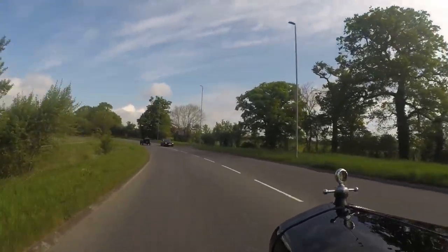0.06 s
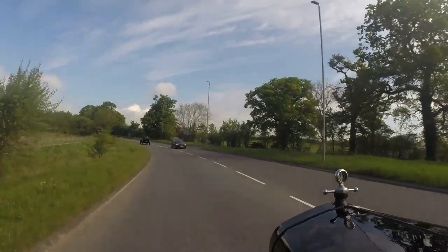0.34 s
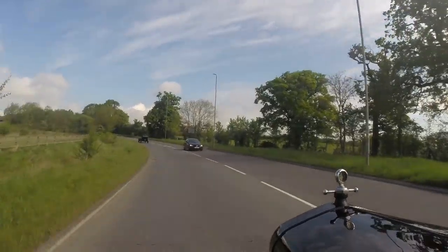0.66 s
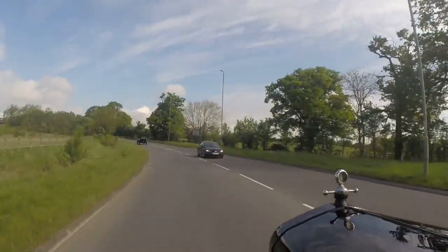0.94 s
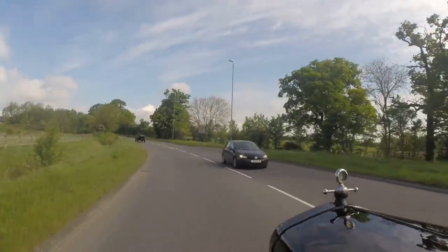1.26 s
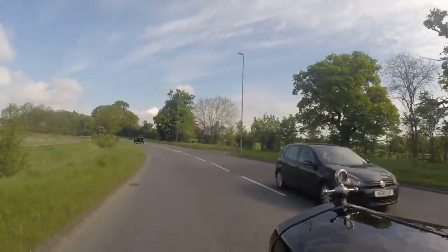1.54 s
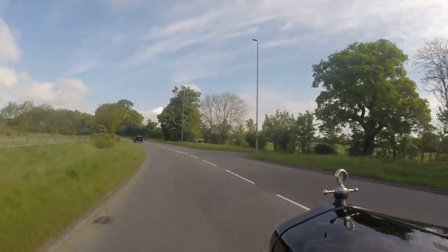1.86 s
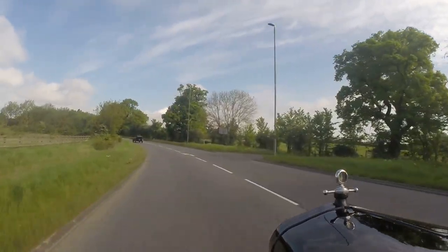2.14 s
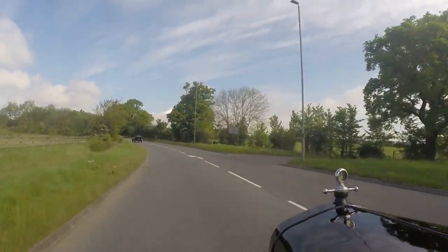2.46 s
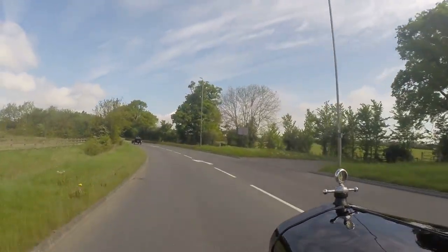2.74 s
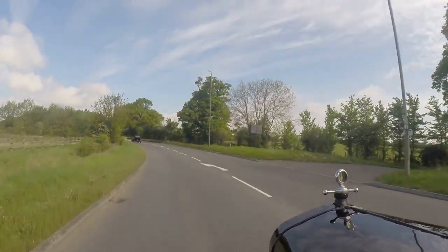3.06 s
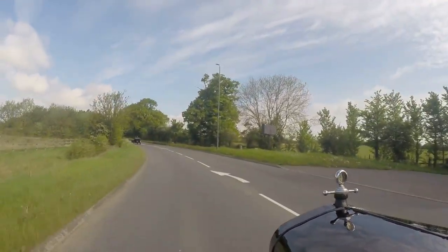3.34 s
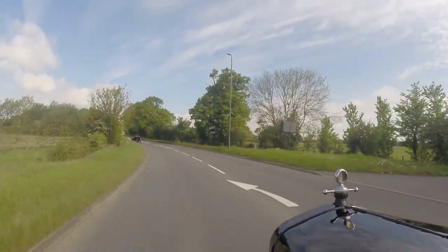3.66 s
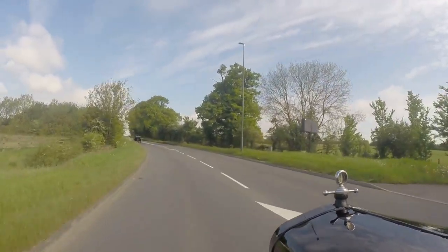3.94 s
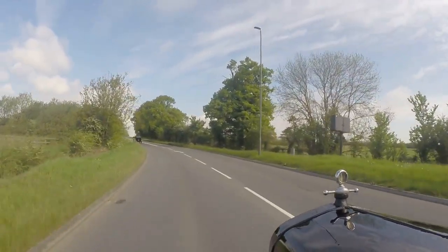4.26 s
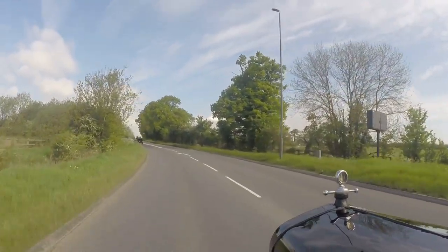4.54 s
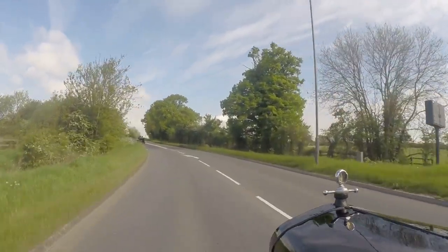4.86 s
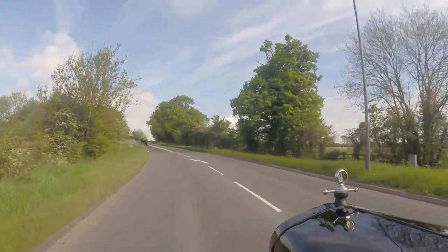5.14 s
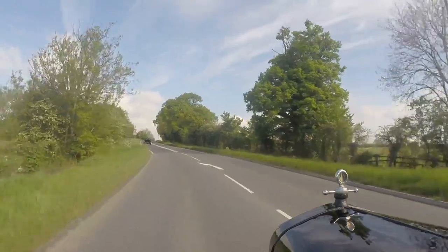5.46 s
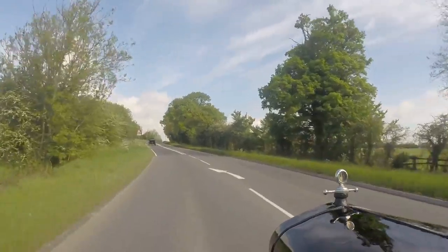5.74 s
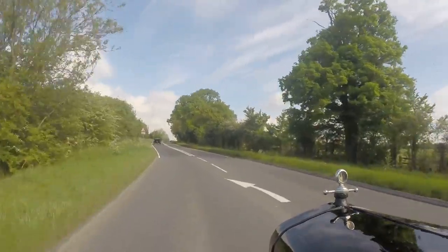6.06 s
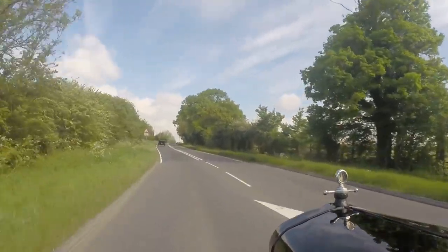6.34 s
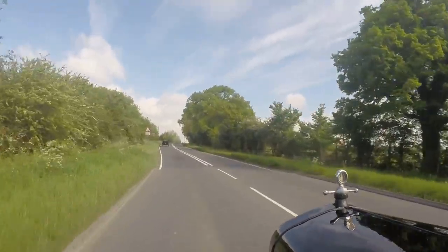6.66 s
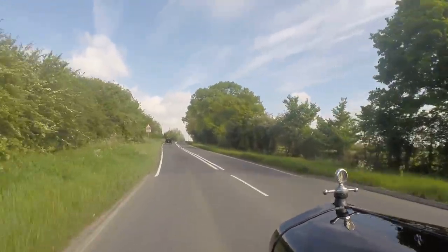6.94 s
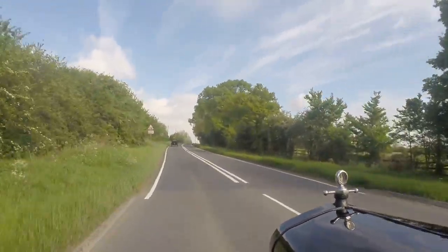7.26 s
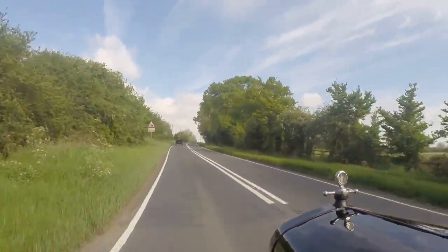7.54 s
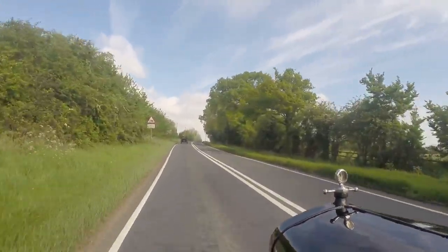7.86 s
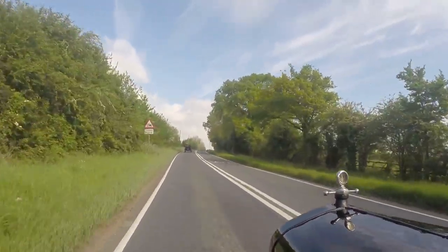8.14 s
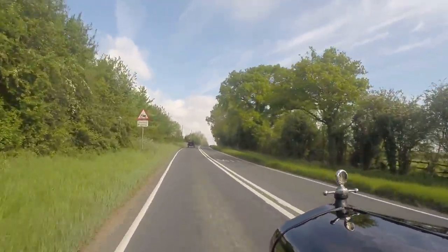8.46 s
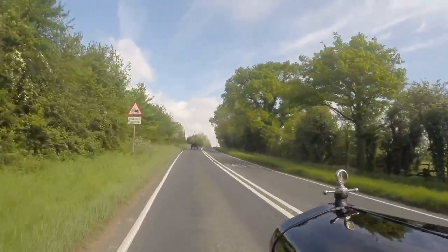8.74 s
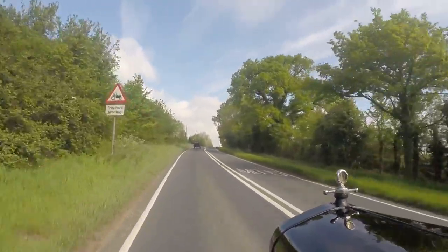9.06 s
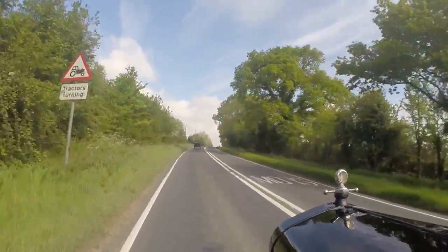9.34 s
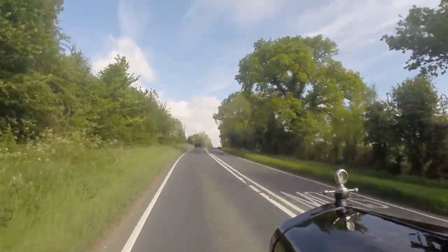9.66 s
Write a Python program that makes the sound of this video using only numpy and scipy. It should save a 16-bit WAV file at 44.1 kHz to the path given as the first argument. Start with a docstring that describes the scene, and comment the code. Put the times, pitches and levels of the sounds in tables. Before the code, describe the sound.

An old four-cylinder car engine drones and clatters steadily along an open road, with tyre rumble and wind buffeting.

```python
"""An old four-cylinder car drones along an open road, heard from just behind the bonnet, slowly gaining speed.
The crank shakes the body and the exhaust drones; a belt-driven fan hums, valves clatter, gears sizzle
and a loose bearing knocks once a turn. Tyres drum through the body, wind buffets, grit ticks on the wings.
Early on a car passes the other way; near the end the tarmac turns smoother."""
import sys
import numpy as np
from scipy import signal
from scipy.fft import rfft, irfft, next_fast_len
from scipy.io import wavfile
from scipy.ndimage import uniform_filter1d, minimum_filter1d, map_coordinates

SR = 44100
rng = np.random.default_rng(int(sys.argv[2]) if len(sys.argv) > 2 else 0)


def persist_wave(psi):
    """Save psi, clipped to +-1, as 16-bit WAV."""
    counts = np.round(np.clip(psi, -1, 1) * 32767).astype(np.int16)
    wavfile.write(sys.argv[1], SR, np.atleast_2d(counts).T)


N = 432180

# Each row: time in seconds, crank speed in Hz.
CRANK_SPEED = [(0, 34.78), (0.6, 35.08), (1.5, 35.98), (2.5, 36.83), (3.5, 37.36), (5, 38.07), (6.5, 38.59),
               (8, 38.93), (9.8, 39.16)]
# Each row: multiple of crank speed, level at cruise in dB, rise in dB per Hz of crank speed,
# flutter in dB, phase drift in radians.
ENGINE_ORDERS = [(1, -18.5, 1.27, 1.1, 0.096), (2, -18, -.5, 0.67, .03), (2.5, -42.5, -1.5, 1.5, 0.22),
                 (3, -30.5, .8, -0.4, 0.058), (3.5, -37.5, -2, 4, .2), (4, -33, -4, -0.5, 0.091),
                 (5, -36.5, -0.5, 1, 0.16), (6.5, -40, 1.5, 1.5, 0.27)]
# Resonances the orders climb through. Each row: centre in Hz, half width in Hz, boost in dB.
BOOMS = [(105.2, 1.6, 8), (111, 1.7, 8)]
# Each row: start in seconds, end in seconds, drop in effort in dB.
THROTTLE_EASES = [(0, 0.26, 4), (7.82, 8.202, 1.15)]
# Each row: multiple of fan speed, level in dB before the bonnet resonance.
FAN_TONES = [(1, -29.5), (2, -40), (4, -50), (6, -58)]
# Single impacts. Each row: time in seconds, relative level in dB.
HARD_KNOCKS = [(0.36, -17), (1.6831, -18), (2.361, -17.5), (3.896, -21), (7.1202, -14), (7.6072, -15),
               (8.8957, -15.5), (8.9693, -16), (9.1501, -17), (9.305, -15), (9.4827, -14.5)]
GRIT_HITS = [(2.0772, -34), (2.987, -28), (2.9996, -30), (4.0384, -31), (4.2567, -30), (5.879, -31),
             (6.6553, -32), (7.1784, -31), (7.4435, -25), (7.672, -29), (9.4105, -34)]
# Bearing fits and rough road. Each row: centre in seconds, half length in seconds, gain in dB.
BEARING_FITS = [(1.1, 0.35, 5.5), (1.65, 0.12, 5.5), (5.75, 0.18, 7), (6.248, .15, 3), (6.545, 0.057, 10),
                (7.198, 0.11, 2.5), (8.65, 0.35, 5), (9.3, 0.072, -2)]
ROAD_BUMPS = [(1.45, 0.23, 1.3), (3, 0.11, 2.5), (6.6, 0.059, 2.5), (7.33, .05, 1.5), (7.65, 0.045, 3),
              (8.934, 0.066, 5)]
# Resonances of the parts. Each row: centre in Hz, width in Hz, gain in dB.
BONNET_MODES = [(424.3, 35, 0), (513, 114, -1.5), (709, 76, -1), (910.5, 50, -6.5)]
BLOCK_MODES = [(1164, 113, 2.5), (1445, 210, 4), (1689, 112, 3), (1999, 270, 1), (2287, 92, 1),
               (2453, 290, -3), (3434, 270, -15.5)]
STEEL_MODES = [(3423, 310, 0.5), (4140, 125, -1), (4317, 280, -1), (4850, 180, -4.5), (5740, 214, 1.5),
               (6420, 280, -11), (6770, 270, -2.5), (7260, 170, -12), (7600, 490, -16), (9600, 1200, -20.5)]
TRIM_MODES = [(12900, 700, -2), (13900, 700, -12)]
# Noise colours. Each row: frequency in Hz, relative density in dB.
BODY_SPECTRUM = [(30, -31), (55, 1.5), (90, 2), (130, -0.5), (175, -2.5), (215, -3), (260, 3), (310, 2),
                 (345, -3), (400, -12), (470, -23.5), (700, -22)]
BUFFET_SPECTRUM = [(12, -32), (19, -11), (25, -1), (30, 0), (35, -2), (44, -10), (56, -20), (90, -45)]
AIRSTREAM_SPECTRUM = [(200, -19), (500, 1), (800, -8), (1000, -7.5), (1500, 0), (2200, -3), (2800, -6),
                      (3200, -12.5), (5000, -20.5), (6300, -20), (7500, -22.5), (8700, -30.5),
                      (11500, -41.5), (14000, -42), (15000, -48)]
SPRAY_SPECTRUM = [(1500, -15), (3500, 10), (5000, -1), (7200, 6), (9500, -10), (12000, -16), (14000, -20),
                  (15000, -28)]
PATTER_SPECTRUM = [(4000, -20), (7500, 4.5), (10000, -8), (13000, -14.5), (15000, -21)]
ONCOMING_SPECTRUM = [(300, -10), (800, 2), (1400, 0), (2500, -8), (5000, -27)]

CRUISE_HZ, FAN_PER_CRANK_TURN = 37, 11 / 4
DRONE_SHARE, BODY_SHARE, HISS_SHARE = 0.62, 0.86, 0.77  # dB per dB of effort


def drone(crank_hz, turns, effort_db):
    """The crank shakes once a turn, two cylinders fire per turn; unequal cylinders add half orders."""
    total = np.zeros(N)
    for order, cruise_db, db_per_hz, flutter_db, drift_rad in ENGINE_ORDERS:
        level_db = at_speed(crank_hz, cruise_db, db_per_hz) + swell(order * crank_hz, BOOMS)
        total += amp(level_db) * tone(order * turns, flutter_db, drift_rad)
    return amp(DRONE_SHARE * effort_db) * total


def fan(turns):
    """The belt spins the fan faster than the crank; tones swell as they climb into a bonnet resonance."""
    fan_turns = FAN_PER_CRANK_TURN * turns
    hum = sum(amp(db) * tone(k * fan_turns, flutter_db=1.5, drift_rad=0.26) for k, db in FAN_TONES)
    return hum + amp(6) * ring(hum, BONNET_MODES)


def clatter(turns, clatter_db):
    """Valves tap four times a turn, a loose bearing once, harder in fits; block and bonnet ring."""
    valves = unit(contacts(4 * turns, scatter_db=3.5, jitter_s=0.0012, t60_s=0.021))
    bearing_db = -6 + swell(np.arange(N) / SR, BEARING_FITS)
    bearing = amp(bearing_db) * unit(contacts(turns, scatter_db=3.5, jitter_s=0.0014, t60_s=0.022))
    block = amp(clatter_db - 1.6 + 0.9 * wobble(18)) * unit(ring(valves + bearing, BLOCK_MODES))
    bonnet = amp(clatter_db - 3.5) * unit(ring(valves + amp(-8) * bearing, BONNET_MODES))
    return block + bonnet


def hard_knocks():
    """The bearing takes up all its play at once: a sharp blow and a short rattle ring the block."""
    times_s, db = np.transpose(HARD_KNOCKS)
    onsets_s = times_s + 0.001
    blow = strikes(onsets_s, amp(db), t60_s=0.0002)
    rattle = 0.04 * strikes(onsets_s, amp(db), t60_s=0.026) * rng.standard_normal(N)
    blow_peak = np.abs(ring(blow, BLOCK_MODES)).max()
    return amp(db.max() + 2) * ring(blow + rattle, BLOCK_MODES) / blow_peak


def gears(turns, hiss_db):
    """Timing gears sizzle in steel parts, swelling once a turn; tappets tick and thin trim buzzes."""
    mesh_db = 2.4 * np.sin(2 * np.pi * (turns - 0.3))
    mesh = unit(ring(amp(mesh_db) * rng.standard_normal(N), STEEL_MODES))
    tappet_hits = contacts(2 * turns + 0.3, scatter_db=6, jitter_s=0.0015, t60_s=0.025)
    trim_hits = contacts(2 * turns, scatter_db=6, jitter_s=0.004, t60_s=0.04)
    tappets = unit(ring(tappet_hits, STEEL_MODES))
    trim = unit(ring(trim_hits, TRIM_MODES))
    return amp(hiss_db) * (amp(-3.5) * mesh + amp(-8) * tappets + amp(-27) * trim)


def body_drumming(body_db):
    """Tyres and engine drum through the body panels."""
    return amp(body_db + 3 + 0.93 * wobble(25)) * noise(BODY_SPECTRUM)


def wind(buffet_db, hiss_db):
    """Eddies thump the microphone; the airstream rushes past the screen."""
    buffet = amp(buffet_db + 1.7 * wobble(6)) * noise(BUFFET_SPECTRUM)
    rush = amp(hiss_db + 10.5 + 1.34 * wobble(30)) * noise(AIRSTREAM_SPECTRUM)
    return buffet + rush


def grit(hiss_db, grains=700):
    """Tyres fling grit at the wings: a few loud sprays over a fine patter."""
    times_s, db = np.transpose(GRIT_HITS)
    sprays = amp(-3) * uniform_filter1d(strikes(times_s, amp(db), t60_s=0.055), size=300)
    when, softness = rng.random((grains, 2)).T
    patter = amp(hiss_db - 2) * strikes(when * N / SR, amp(-12 * np.sqrt(softness)), t60_s=0.019)
    return sprays * noise(SPRAY_SPECTRUM) + patter * noise(PATTER_SPECTRUM)


def oncoming_car(abreast_s=1.63, abreast_db=-34, closing_m_per_s=31, across_m=3.8):
    """Tyre noise from the other lane swells and fades as 1 / distance."""
    along_m = closing_m_per_s * (np.arange(N) / SR - abreast_s)
    return amp(abreast_db) * across_m / np.hypot(along_m, across_m) * noise(ONCOMING_SPECTRUM)


def effort(t, pedal_s=0.22):
    """Engine effort in dB: 0, dipping while the throttle is eased."""
    return -sum(db * np.interp(t, [start - pedal_s, start, end, end + pedal_s], [0, 1, 1, 0])
                for start, end, db in THROTTLE_EASES)


def at_speed(crank_hz, cruise_db, db_per_hz):
    """Level in dB, linear in crank speed."""
    return cruise_db + db_per_hz * (crank_hz - CRUISE_HZ)


def swell(x, rows):
    """Sum of bell curves along x, in dB."""
    return sum(db * np.exp(-((x - centre) / half_width) ** 2) for centre, half_width, db in rows)


def tone(turns, flutter_db, drift_rad):
    """Sine of rms 1, wavering in level and phase."""
    envelope = amp(flutter_db * wobble(8.3))
    phase_rad = 2 * np.pi * (turns + rng.random()) + drift_rad * wobble(7)
    return unit(envelope * np.sin(phase_rad))


def contacts(turns, scatter_db, jitter_s, t60_s):
    """A noise burst at each whole turn, uneven in size and timing."""
    times_s = np.interp(np.arange(1, int(turns[-1])), turns, np.arange(N) / SR)
    size, late = rng.uniform(-1, 1, (len(times_s), 2)).T
    return strikes(times_s + jitter_s * late, amp(scatter_db * size), t60_s) * rng.standard_normal(N)


def strikes(times_s, sizes, t60_s):
    """Envelope that jumps at each time and decays."""
    onsets = np.clip(times_s * SR, 0, N - 1).astype(int)
    decay = amp(-60 * np.arange(SR // 8) / SR / t60_s)
    return signal.fftconvolve(np.bincount(onsets, sizes, N), decay)[:N]


def ring(x, modes):
    """x through parallel resonances with steep skirts."""
    def bandpass(hz, centre_hz, width_hz):
        return 1j * hz * width_hz / (centre_hz ** 2 - hz ** 2 + 1j * hz * width_hz)
    return filtered(x, lambda hz: sum(amp(db) * bandpass(hz, *band) ** 2 for *band, db in modes))


def noise(spectrum):
    """Coloured noise of rms 1."""
    knots_hz, db = np.transpose(spectrum)

    def colour(hz):
        return amp(np.interp(np.log(hz + 1), np.log(knots_hz), db, left=-120, right=-120))
    return unit(filtered(rng.standard_normal(N), colour))


def filtered(x, response):
    """x through a complex frequency response."""
    size = next_fast_len(N + SR // 2)
    return irfft(rfft(x, size) * response(np.fft.rfftfreq(size, 1 / SR)), size)[:N]


def wobble(rate_hz):
    """Smooth random curve, rate_hz knots a second."""
    knots = rng.standard_normal(int(N * rate_hz / SR) + 4)
    return map_coordinates(knots, [np.arange(N) * rate_hz / SR])


def amp(db):
    return 10 ** (np.asarray(db) / 20)


def unit(x):
    return x / np.sqrt(np.mean(x ** 2) + 1e-20)


def scene():
    """Crank speed paces the engine; speed, effort and road surface set the layer levels."""
    t = np.arange(N) / SR
    crank_hz = np.interp(t, *np.transpose(CRANK_SPEED))
    turns = np.cumsum(crank_hz) / SR
    effort_db = effort(t)
    smoother_db = np.interp(t, [7.7, 7.887], [0, -1])  # onto smoother tarmac
    body_db = at_speed(crank_hz, cruise_db=-23.5, db_per_hz=-0.11) + BODY_SHARE * effort_db
    body_db += swell(t, ROAD_BUMPS) + smoother_db
    hiss_db = at_speed(crank_hz, cruise_db=-43, db_per_hz=0.37) + HISS_SHARE * effort_db
    hiss_db += 0.84 * smoother_db
    clatter_db = at_speed(crank_hz, cruise_db=-30.5, db_per_hz=-0.05) + effort_db
    buffet_db = at_speed(crank_hz, cruise_db=-19, db_per_hz=0.42)
    hum = drone(crank_hz, turns, effort_db) + fan(turns)
    metal = clatter(turns, clatter_db) + hard_knocks() + gears(turns, hiss_db)
    outside = body_drumming(body_db) + wind(buffet_db, hiss_db) + grit(hiss_db) + oncoming_car()
    return (hum + metal + outside)[None]


def record(dry):
    """A limiter ducks the tallest peaks; a low-pass cuts the top treble."""
    ceiling, top_hz = 0.8, 15100
    x = dry[0]
    needed_gain = ceiling / np.maximum(np.abs(x), ceiling)
    gain = uniform_filter1d(minimum_filter1d(needed_gain, size=1200), size=1000)
    return filtered(x * gain, lambda hz: hz < top_hz)[None]


dry = scene()
out = record(dry)
persist_wave(out)
```